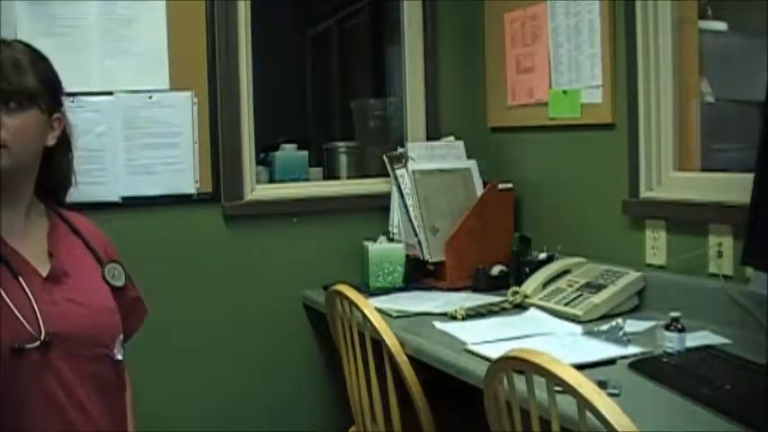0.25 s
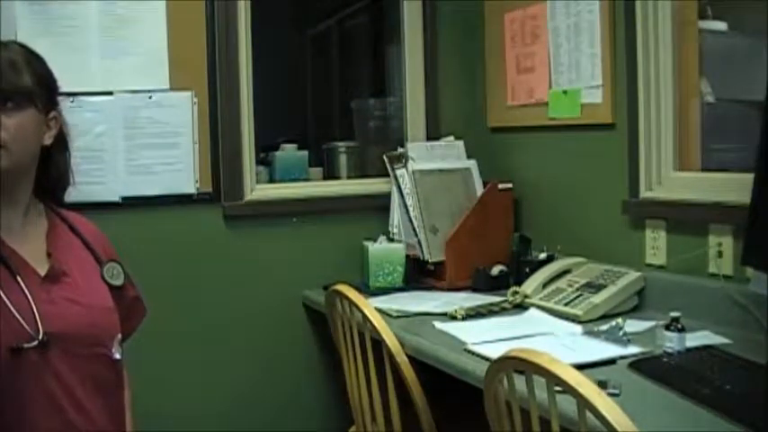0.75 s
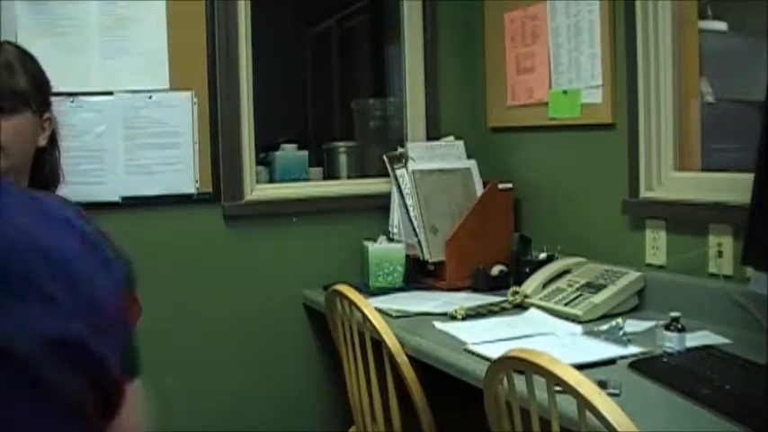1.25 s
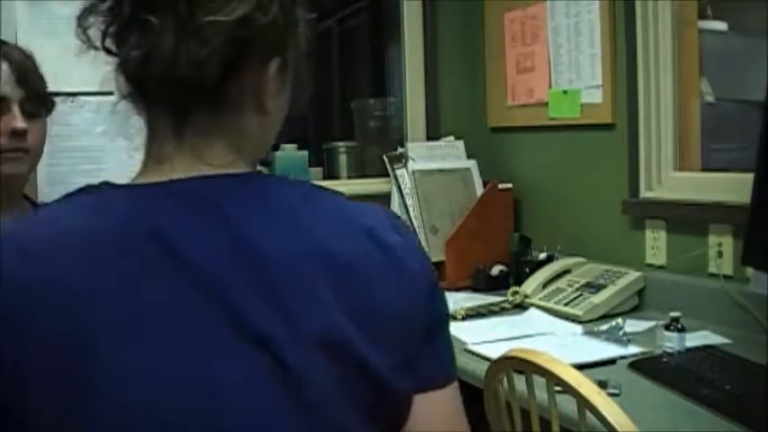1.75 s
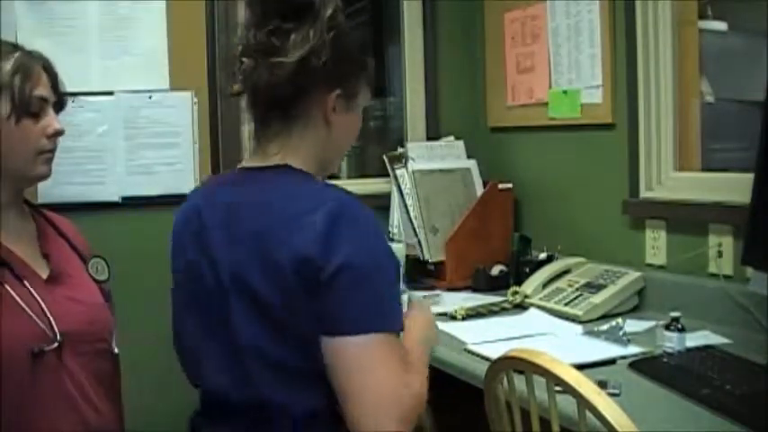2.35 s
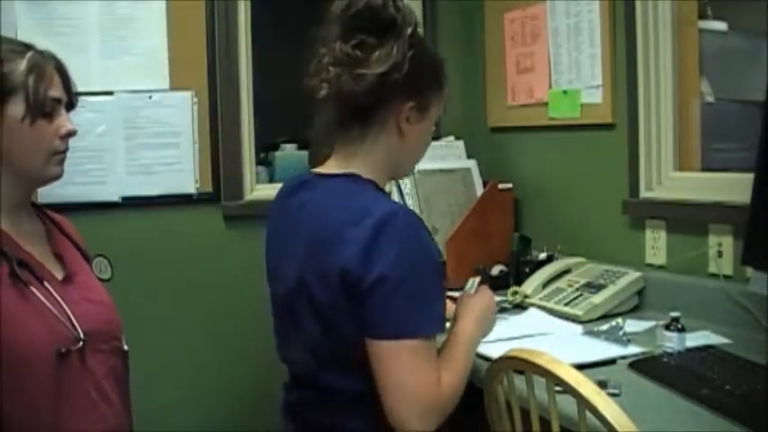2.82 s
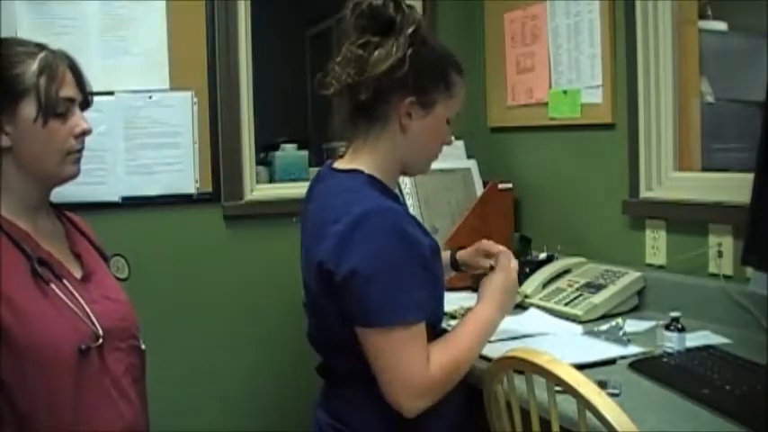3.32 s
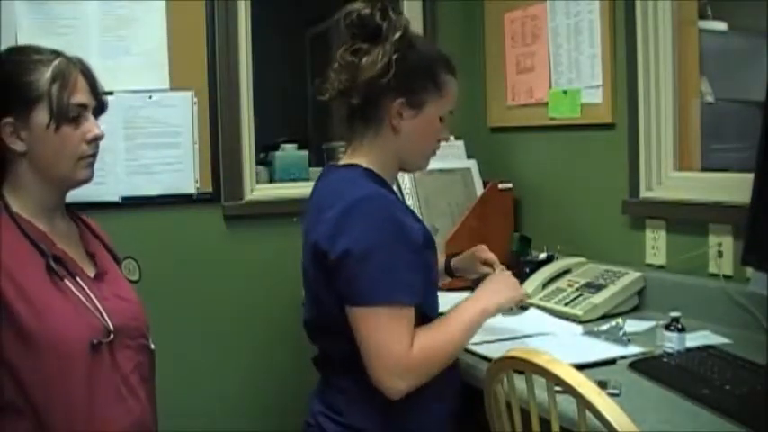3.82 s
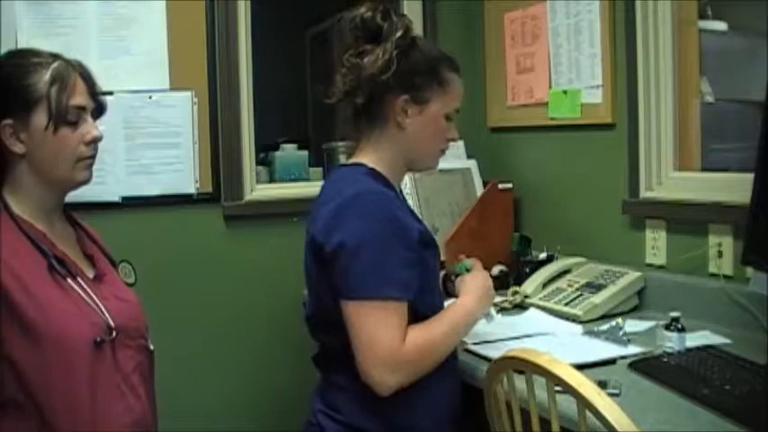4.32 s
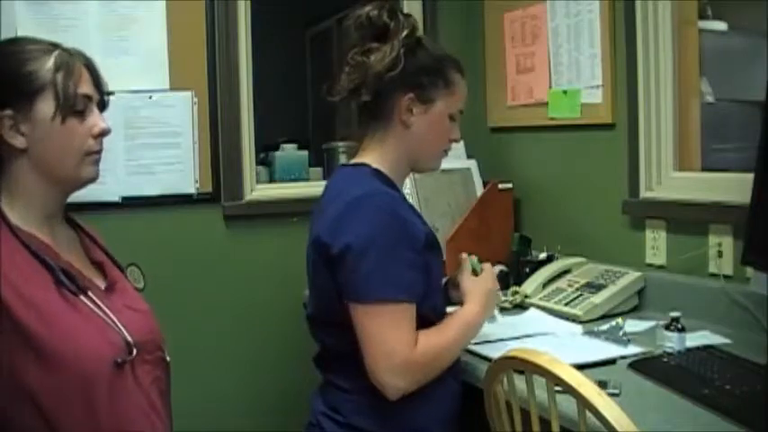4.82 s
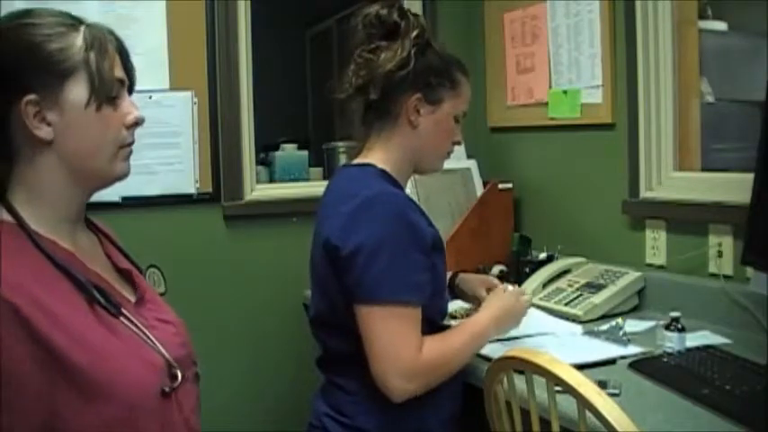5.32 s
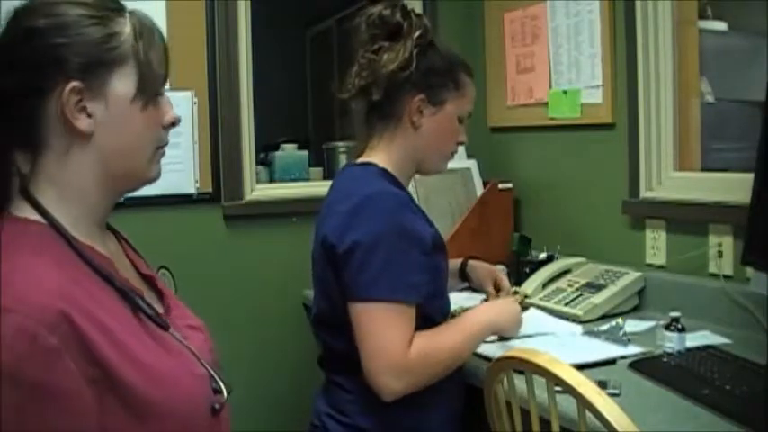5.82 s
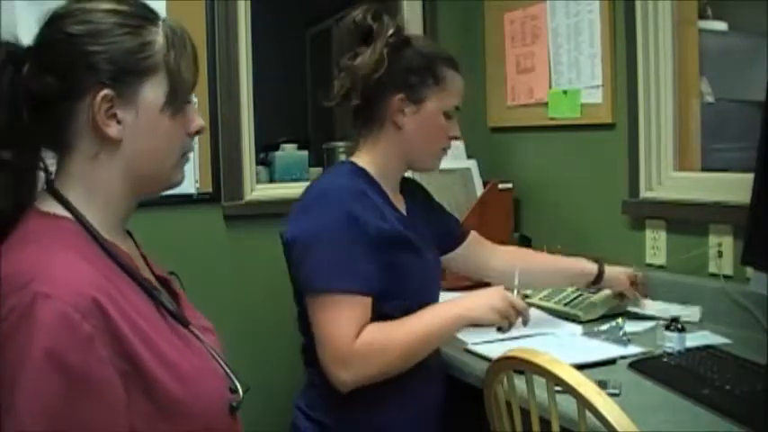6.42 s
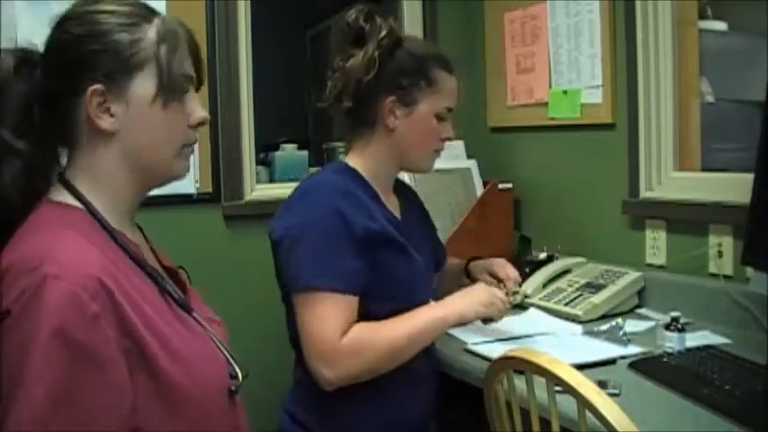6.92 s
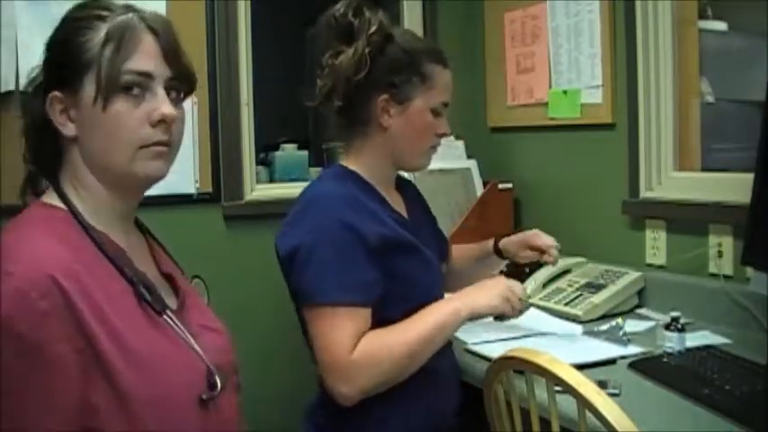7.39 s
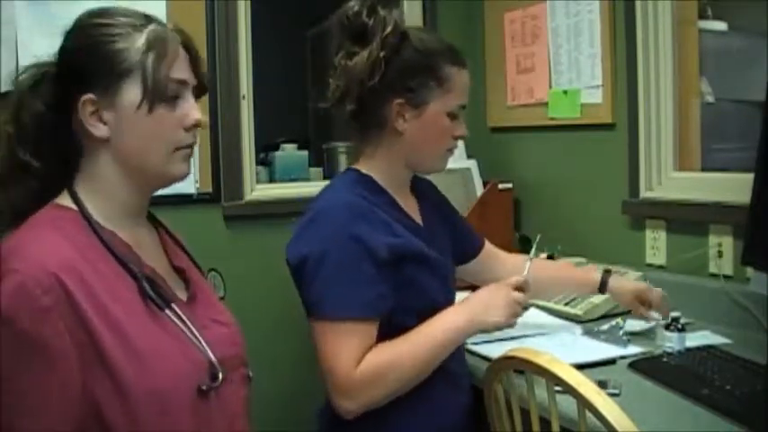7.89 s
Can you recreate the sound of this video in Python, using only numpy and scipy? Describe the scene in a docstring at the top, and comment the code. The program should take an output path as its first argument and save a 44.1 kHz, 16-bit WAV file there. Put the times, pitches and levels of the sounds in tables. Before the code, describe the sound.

A small, hard-walled indoor room with quiet ventilation: soft air noise, a wavering low hum and a faint duct note. From 0 to 0.7 s, sleeves and paper rub faintly well to the left while thin film ticks and pops. Around 1.3 s a stronger clothing swish and a short crinkle move toward the centre, with a snap at 1.55. Soft rustling continues to 3 s. Short crinkles and a cluster of dull furniture bumps come at 3.0-3.3. From 3.5 the film crackles more, with snaps at 4.05 and 4.3, the loudest sharp pop at 4.46, then a dense bright tearing burst near 4.7. A crisp snap falls at 5.04, smaller crinkles follow, and more snaps come at 6.1 and 6.5. A sleeve rubs at 6.65, hard plastic clicks at 7.0, then faint ticks and rustle to about 8 s. Close microphones, short bright reverberation.

```python
"""Sleeves and paper rub, at first well to the left, and film begins to snap: a plastic and paper syringe wrapper
is picked up, peeled open and put down at a counter in a small, hard-walled room, before two close microphones.
Film snaps are ringing pulses, and crinkle, paper and sleeves are grainy noise swelling with each stroke.
Struck modes make the clicks of the syringe's plastic and the dull bumps of the furniture.
Underneath lie a ventilation fan's wavering hum, coloured air noise and a faint duct note."""
import sys
import numpy as np
from scipy import signal
from scipy.fft import rfft, irfft, next_fast_len
from scipy.io import wavfile

SR = 44100
rng = np.random.default_rng(int(sys.argv[2]) if len(sys.argv) > 2 else 0)


def output_pcm(signal):
    """Save a mono or channel-first signal as 16-bit PCM at the path in sys.argv[1].

    Samples are clipped to [-1, 1] before scaling.
    """
    pcm = np.clip(np.atleast_2d(signal).T, -1, 1) * 32767
    wavfile.write(sys.argv[1], SR, np.round(pcm).astype(np.int16))


N = 359415

# Ventilation air. Each row: frequency in Hz, relative level in dB per Hz.
AIR_SPECTRUM = [(15, -23), (25, -25), (70, -8), (190, -7), (373, -4.5), (489, -6.5), (677, -6.5),
                (887, -11.5), (1040, -9), (1160, -13), (2050, -14.5), (2610, -17.5), (6920, -22),
                (7510, -16.5), (16000, -33)]
AIR_DB = -56.5  # rms level
# The fan's hum as it comes and goes. Each row: time in seconds, relative level in dB.
HUM_LEVEL = [(0.0, -75), (1.5, -61), (3.75, -70), (3.81, -76.5), (7.72, -84), (7.81, -67), (8.15, -90)]
HUM_HZ = 66.2
# How long the room rings. Each row: frequency in Hz, time to fall by 60 dB in seconds.
ROOM_DECAY = [(100, 0.23), (500, 0.32), (2000, 0.29), (5000, 0.35), (9000, 0.24), (15000, 0.27)]
# Colour of the room's answer. Each row: frequency in Hz, level in dB.
ROOM_TONE = [(100, -2), (700, 2.5), (2000, -0.5), (5000, -2), (9500, -0.5), (12000, -3.5), (15000, -10)]
# Likeness of diffuse sound at the two microphones. Each row: frequency in Hz, correlation (1 is identical).
CHANNEL_LIKENESS = [(50, 0.088), (140, 0.021), (300, 0.05), (700, 0.37), (2000, 0.76), (4500, 0.69),
                    (8000, 0.5), (14000, 0.14)]
# Place of the wrapper. Each row: time in seconds, direct sound left minus right in dB,
# share of it scattered on the way (0-1).
WRAPPER_POSITION = [(0, 11.5, 0.48), (1.5, 3, 0.66), (3, 1, 0.48), (4.3, 1.5, 0.01), (5.1, 2, 0.07),
                    (6, 1.5, 0.19), (8, 1, 0.56)]

# Dull bumps on the furniture. Each row: start in seconds, relative level in dB, boom of the spot hit in Hz.
FURNITURE_BUMPS = [(0.137, -44, 125), (0.15, -45, 230), (2.598, -41.5, 600), (2.859, -45.5, 520),
                   (2.895, -41, 523), (3.217, -33.5, 910), (3.225, -32.5, 112), (3.243, -28.5, 764),
                   (3.25, -29.5, 1020), (3.264, -33, 380), (3.288, -45, 106), (3.347, -41, 55),
                   (4.057, -35, 600), (4.594, -41.5, 187), (4.715, -39.5, 655), (5.885, -42.5, 545),
                   (5.935, -49, 420), (6.077, -37, 570), (6.41, -42.5, 222), (6.435, -46, 230),
                   (7.571, -46.5, 220)]
# Modes of the furniture. Each row: frequency in Hz, relative level in dB, time to fall by 60 dB in seconds.
FURNITURE_MODES = [(110, -28, 0.032), (178, -7, 0.013), (301, 0, .03), (350, -3, 0.021), (513, -6, 0.041),
                   (740, -2, 0.047), (1020, 7, 0.0079), (1430, 3, 0.032), (1860, 0, 0.041)]
HARDNESS_RATIO = 2.2  # a contact passes frequencies up to this multiple of its boom

# Spectra of swishing sleeves, scuffed paper and crinkling film.
# Each row: frequency in Hz, relative level in dB per Hz.
SLEEVE_SPECTRUM = [(300, -26), (800, -11.5), (1450, -3.5), (1900, 2), (2500, -4.5), (4500, -9),
                   (9000, -13.5), (15000, -39.5)]
PAPER_SPECTRUM = [(60, -22), (150, -21), (300, -9), (600, -1), (1100, -1.5), (1800, -8.5), (4000, -59),
                  (9000, -41)]
FILM_SPECTRUM = [(200, -43), (800, -25.5), (2000, -7.5), (3200, -3.5), (5000, -2), (7000, -5), (9000, 2),
                 (11000, -15), (13000, -16), (16000, -30)]
# Strokes: sleeves swish, hands scuff over paper, fingers squeeze the film.
# Each row: peak in seconds, relative level in dB, rise in seconds, fall in seconds.
SLEEVE_STROKES = [(0.02, -51.5, 0.13, .95), (0.8, -51, 0.15, 0.067), (1.35, -35.5, 0.24, 0.18),
                  (1.54, -45, 0.23, 0.34), (2.19, -45, 0.31, 0.17), (2.77, -47, 0.34, 0.37),
                  (3.33, -54, 0.64, 0.36), (4.14, -52.5, 0.37, 0.62), (4.88, -55, .35, 1.0),
                  (5.87, -49.5, 0.13, .15), (6.06, -49, 0.17, 0.27), (6.655, -41.5, 0.13, 0.19),
                  (7.81, -56, 0.46, .22)]
PAPER_STROKES = [(0.02, -52.5, 0.12, .45), (1.25, -49.5, 0.12, 0.46), (1.47, -52, 0.18, .4),
                 (2.05, -56, 0.17, 0.5), (2.81, -54, 0.38, 1.0), (4.07, -50.5, 0.6, 0.25),
                 (4.66, -56, 0.17, 0.96), (5.26, -61.5, 0.36, 0.73), (5.89, -53, 0.14, 0.13),
                 (6.1, -59, 0.22, 0.13), (6.67, -49.5, 0.15, .18), (7.85, -60.5, 0.62, 0.41)]
FILM_SQUEEZES = [(0.02, -48, 0.29, 0.21), (0.62, -50, 1, 0.39), (1.305, -35.5, 0.033, 0.055),
                 (1.44, -48.5, 0.21, 0.58), (1.755, -45.5, 0.041, 0.056), (2.095, -50, 0.038, 0.047),
                 (2.33, -52, 0.3, 0.24), (2.89, -44, 0.31, 0.13), (3.01, -47.5, 0.022, 0.027),
                 (3.125, -40, 0.017, 0.025), (3.27, -52.5, 0.18, 1), (3.875, -42.5, .03, 0.11),
                 (3.99, -43, .4, 0.47), (4.205, -43, .02, 0.041), (4.68, -43.5, 0.4, .75),
                 (4.718, -26, 0.07, 0.07), (4.93, -45, 0.083, 0.086), (5.17, -47, 0.45, 0.25),
                 (5.4, -47, 0.059, 0.23), (5.6, -56, 0.39, 0.75), (5.84, -47, 0.055, 0.093),
                 (6.07, -45.5, 0.4, 0.21), (6.495, -43, 0.088, 0.033), (6.68, -51, 0.31, .14),
                 (6.845, -47.5, .015, 0.032), (7.54, -61, 0.27, .75)]
# Each stroke speeds up evenly from rest and slows evenly to rest; its sound grows with this power of the speed.
SPEED_POWER = 1.4

# The syringe's stiff plastic parts click together. Each row: start in seconds, relative level in dB.
SYRINGE_CLICKS = [(6.994, -30), (6.9985, -30), (7.001, -43), (7.091, -41.5)]
# Modes of those parts. Each row: frequency in Hz, relative level in dB, time to fall by 60 dB in seconds.
SYRINGE_MODES = [(2350, -9.5, 0.0058), (2950, -4.5, 0.0075), (4750, -13, 0.0056), (7740, -0.5, 0.01),
                 (9400, -2, .003)]

# The film buckles loudly. Each row: start in seconds, relative level in dB, lows against the middle in dB,
# highs against the middle in dB, ring of the facet in Hz.
FILM_SNAPS = [(0.0978, -47, 2, -13, 1390), (0.1487, -43, 5, 3, 1350), (0.2382, -47.5, 7, 0, 1680),
              (0.2988, -41.5, -12, -7, 3740), (0.371, -48, 4.5, 6, 1720), (0.4128, -44, -1, 4.5, 8270),
              (0.49, -48, -6, -2, 4820), (0.531, -47.5, -5, -14, 4200), (0.5558, -33.5, -6, 3.5, 4570),
              (0.6688, -34, -20.5, -8, 4750), (0.9055, -51.5, -4.5, 4.5, 1370),
              (1.5478, -39, -15, -7, 4580), (2.773, -46.5, -25, 1, 4820), (3.2461, -45, -1, 3, 1390),
              (3.3576, -46, -8, -29, 2070), (3.5535, -43, -6, -3.5, 5040), (3.6699, -51, -20, 0, 6200),
              (3.7297, -50, -10, -14, 3800), (3.798, -43.5, -27.5, 8.5, 8150),
              (3.9605, -44.5, 4.5, 3, 4200), (4.0542, -33.5, -7, 0, 4670), (4.1336, -41, -0.5, 7, 4530),
              (4.2931, -30, -16, 0.5, 6600), (4.4581, -18, -20, 0, 5450), (4.6461, -37, -37, -9, 7740),
              (4.6579, -35, -23, 6, 7580), (4.6781, -34, -30, 4, 9200), (4.7008, -30.5, -28, 7, 8900),
              (4.7104, -25, -15.5, 1, 9400), (4.7146, -37, 6, -12, 7920), (4.955, -46, -3, 8, 8270),
              (5.0418, -25.5, -3, 12.5, 7600), (5.1563, -49, 0, 12, 8270), (5.3189, -46, -1, -3, 4470),
              (5.3862, -46, -6, 8.5, 6400), (5.4643, -46.5, -10, 2, 3230), (5.5763, -51, -15, 26, 8200),
              (5.6304, -48, -14, 8, 7850), (5.818, -49.5, 3, 10.5, 9990), (5.8664, -42, 10, 1, 1450),
              (5.9154, -46, -9, 9, 1720), (6.0788, -33, -3.5, 1.5, 5400), (6.2333, -52.5, 6.5, 31, 9300),
              (6.442, -42.5, -10, 6, 5050), (6.4641, -32, -15, -8, 5130), (6.4846, -27, -14.5, -2, 4750),
              (7.302, -47, -4, 9.5, 9600), (7.335, -52.5, -3, 17, 9300), (7.785, -41.5, -9, -5, 2270),
              (7.8715, -42, -2, 3, 1750), (7.9259, -46, -2, 3, 1670)]
# Small facets flip at random: mean rate, level against the squeeze and its spread, range of their rings.
FLIPS_PER_S, FLIP_DB, FLIP_SPREAD_DB = 6.9, -2, -2
FLIP_LOW_HZ, FLIP_HIGH_HZ = 2000, 9000

CUTOFF_HZ = 16200  # top of the recorded band


def from_db(db):
    """Decibels to gain."""
    return 10 ** (np.asarray(db) / 20)


def rms_one(x):
    """Scale to rms 1."""
    return x / np.sqrt(np.mean(x ** 2) + 1e-20)


def unit_energy(x):
    """Scale to energy 1 per channel."""
    return rms_one(x) / np.sqrt(x.shape[-1])


def in_time(rows):
    """The columns of a curve at every sample."""
    s, *columns = np.transpose(rows)
    return [np.interp(np.arange(N) / SR, s, c) for c in columns]


def at_hz(points, hz):
    """Read a table on a log-frequency axis."""
    table_hz, values = np.transpose(points)
    return np.interp(np.log(hz + 1e-9), np.log(table_hz), values)


def butter(x, hz, kind, order=2):
    """Causal Butterworth filter."""
    sos = signal.butter(order, np.clip(hz, 10, .47 * SR), kind, fs=SR, output="sos")
    return signal.sosfilt(sos, x)


def resonance(x, hz, q):
    """One resonance with gain 1 at its top."""
    b, a = signal.iirpeak(min(hz, .4 * SR), max(q, 1), fs=SR)
    return signal.lfilter(b, a, x)


def coloured(x, spectrum):
    """Give a noise its spectrum; rms 1."""
    size = next_fast_len(N)
    gain = from_db(at_hz(spectrum, np.fft.rfftfreq(size, 1 / SR)))
    return rms_one(irfft(rfft(x, size) * gain, size)[..., :N])


def drift(rate):
    """Slow random wander of rms 1, with a new value `rate` times a second."""
    knots = rng.standard_normal(N // 20)
    return rms_one(np.interp(np.arange(N) / SR * rate, np.arange(len(knots)), knots))


def diffuse(size):
    """White stereo noise arriving from all sides, as two close microphones hear it."""
    mid, side = rfft(rng.standard_normal((2, size)))
    alike = np.clip(at_hz(CHANNEL_LIKENESS, np.fft.rfftfreq(size, 1 / SR)), -.99, .99)
    return irfft(np.sqrt(1 + alike) * mid + np.sqrt(1 - alike) * side * [[1], [-1]], size)


def add(track, s, sound):
    """Mix a sound in at a time."""
    at = max(round(s * SR), 0)
    track[at:at + len(sound)] += sound[:N - at]


def ventilation(hum_gain_db=-0.5, waver=.6, right_lag=1.0):
    """Steady air noise and a low hum that wavers in phase and lags on the right (both in radians)."""
    hum_db, = in_time(HUM_LEVEL)
    phase = 2 * np.pi * HUM_HZ * np.arange(N) / SR + waver * drift(rate=7.4)
    hum = np.sqrt(2) * from_db(hum_db + hum_gain_db) * np.sin([phase, phase - right_lag])
    air = coloured(diffuse(next_fast_len(N)), AIR_SPECTRUM)
    return hum + from_db(AIR_DB) * air


def duct(hz=268, q=14, level_db=-71):
    """The air stream sounds a faint note in its duct: noise through one resonance."""
    return from_db(level_db) * rms_one(resonance(rng.standard_normal(N), hz, q))


def room(x, build_s=0.00076, counter_s=0.0046, counter_gain=0.1, wall_s=.0128, wall_gain=0.13,
         ripple_db=2.5, ripple_hz=45, count=23):
    """Reflections off the counter and a wall, then a diffuse field that stores each band's energy and lets it die."""
    size = next_fast_len(N)
    bins = np.fft.rfftfreq(size, 1 / SR) / ripple_hz
    # overlapping room modes leave a fine, fixed ripple on the spectrum
    ripple = from_db(ripple_db * np.interp(bins, np.arange(SR // 10), rng.standard_normal(SR // 10)))
    # neighbouring bands get unrelated noise
    fields = [irfft(rfft(diffuse(size)) * ripple, size)[:, :N] for _ in range(2)]
    edges = np.geomspace(80, 17000, count + 1)
    out = np.zeros((2, N))
    build = np.exp(-1 / (build_s * SR))
    for k, band in enumerate(zip(edges, edges[1:])):
        hz = np.sqrt(band[0] * band[1])
        keep = from_db(-60 / (at_hz(ROOM_DECAY, hz) * SR)) ** 2  # energy left after one sample
        fed = signal.lfilter([1 - build], [1, -build], butter(x, band, "band") ** 2)
        stored = signal.lfilter([1 - keep], [1, -keep], fed)
        noise = rms_one(butter(fields[k % 2], band, "band"))
        out += from_db(at_hz(ROOM_TONE, hz)) * np.sqrt(stored) * noise
    for channel in out:
        add(channel, counter_s, counter_gain * x)
        add(channel, wall_s, wall_gain * x)
    return out


def scattered(x, share, scatter_s=0.0014):
    """Bodies and clutter in the path break part of a sound into a quick flurry that arrives from all sides."""
    size = SR // 100
    flurry = diffuse(size) * np.exp(-np.arange(size) / SR / scatter_s)
    flurry = irfft(np.exp(1j * np.angle(rfft(flurry))), size)  # spread in time, with a flat spectrum
    share = np.clip(share, 0, 1)
    broken = signal.oaconvolve(x[None], flurry, axes=1)[:, :N]
    return np.sqrt(1 - share) * x + np.sqrt(share) * broken


def struck(modes, scatter_db):
    """Decaying modes, each with a random sign and, where scatter is set, a new strength at every blow."""
    t = np.arange(SR // 8) / SR
    hz, level_db, t60 = np.transpose(modes)[:, :, None]
    strength = from_db(level_db + scatter_db * rng.standard_normal(hz.shape))
    strength = strength * rng.choice([-1, 1], hz.shape)
    decay = np.exp(-np.log(1000) * t / t60)
    return np.sum(strength * np.sin(2 * np.pi * hz * t) * decay, axis=0)


def bumps(gain_db=22, lowest_hz=70, scrape=0.83, scrape_s=0.0033, boom=1.0, boom_q=3):
    """Each contact scrapes briefly and rings the panels; the lower the spot booms, the duller it is."""
    out = np.zeros(N)
    for s, db, boom_hz in FURNITURE_BUMPS:
        ring = unit_energy(struck(FURNITURE_MODES, scatter_db=0.0))
        fade = np.exp(-np.arange(len(ring)) / SR / scrape_s)
        grit = butter(rng.standard_normal(len(ring)) * fade, [130, 1900], "band")
        contact = ring + scrape * unit_energy(grit)
        knock = unit_energy(butter(contact, HARDNESS_RATIO * boom_hz, "low", order=4))
        hollow = unit_energy(resonance(signal.unit_impulse(len(ring)), boom_hz, boom_q))
        add(out, s, from_db(db + gain_db) * unit_energy(knock + boom * hollow))
    return butter(out, lowest_hz, "high")


def strokes(rows):
    """Gain of a series of strokes, each swelling from rest to its peak and back; overlapping strokes add in power."""
    t, power = np.arange(0, N, 20) / SR, 0
    for peak_s, db, rise_s, fall_s in rows:
        speed = np.maximum(1 - np.maximum((peak_s - t) / rise_s, (t - peak_s) / fall_s), 0)
        power = power + (from_db(db) * speed ** SPEED_POWER) ** 2
    return np.interp(np.arange(N) / SR, t, np.sqrt(power))


def grains(per_s, spread_db, clump_db, smooth, densest=1.5):
    """Tiny slips of uneven size, coming in clumps over smooth friction; rms 1."""
    rate = per_s * from_db(clump_db * np.minimum(drift(rate=45), densest))
    born = rng.random(N) < rate / SR
    sizes = from_db(spread_db * np.minimum(rng.exponential(1, N), 4)) * rng.choice([-1, 1], N)
    return rms_one(rms_one(born * sizes) + smooth * rng.standard_normal(N))


def facets(x, low_hz=1800, high_hz=13000, q=6, count=16):
    """Each grain sets a facet of its own ringing briefly; rms 1."""
    dealt = rng.integers(0, count, N)  # which facet each sample drives
    facet_hz = np.geomspace(low_hz, high_hz, count)
    return rms_one(sum(resonance(x * (dealt == k), hz, q) for k, hz in enumerate(facet_hz)))


def handling(scuff_gain_db=-2.0, swish_gain_db=-3, crinkle_gain_db=-0.5, plain=0.36):
    """Paper and sleeves slide with a dull, dense grain; the film crinkles brighter and sparser, in changing colours."""
    scuff = coloured(grains(per_s=1100, spread_db=0.5, clump_db=7.5, smooth=0.71), PAPER_SPECTRUM)
    swish = coloured(grains(per_s=1800, spread_db=6.0, clump_db=2.5, smooth=0.71), SLEEVE_SPECTRUM)
    creases = grains(per_s=300, spread_db=2.0, clump_db=9.5, smooth=0.62)
    crinkle = coloured(facets(creases) + plain * creases, FILM_SPECTRUM)
    paper = from_db(scuff_gain_db) * strokes(PAPER_STROKES) * scuff
    sleeves = from_db(swish_gain_db) * strokes(SLEEVE_STROKES) * swish
    film = from_db(crinkle_gain_db) * strokes(FILM_SQUEEZES) * crinkle
    return paper + sleeves + film


def clicks(gain_db=20, crack=0.4, crack_s=0.001):
    """Hard plastic on hard plastic: a broad crack and a short ring."""
    out = np.zeros(N)
    for s, db in SYRINGE_CLICKS:
        ring = unit_energy(struck(SYRINGE_MODES, scatter_db=1.0))
        fade = np.exp(-np.arange(len(ring)) / SR / crack_s)
        tick = butter(rng.standard_normal(len(ring)) * fade, [1000, 10500], "band")
        add(out, s, from_db(db + gain_db) * (ring + crack * unit_energy(tick)))
    return out


def flips(low_db=-6, high_db=2):
    """Small snaps at random moments, following the strength of the squeeze; rows as in FILM_SNAPS."""
    when, pitch, chance = rng.random((200, 3)).T
    at = (when * N).astype(int)
    squeeze_db = 20 * np.log10(strokes(FILM_SQUEEZES)[at] + 1e-9)
    db = squeeze_db + FLIP_DB + FLIP_SPREAD_DB * rng.standard_normal(len(at))
    hz = FLIP_LOW_HZ * (FLIP_HIGH_HZ / FLIP_LOW_HZ) ** pitch
    chosen = np.flatnonzero(chance < FLIPS_PER_S * N / SR / len(at))
    return [(at[k] / SR, db[k], low_db, high_db, hz[k]) for k in chosen]


def snaps(crumble=0.11, crumble_s=0.00055, ring=1.18, ring_q=8, under_ring=0.47, under_ratio=0.434,
          spread=0.47, band_edges_hz=(580, 2000, 6000, 10800),
          direct_db=27.5, treble_beaming=0.19, radiated_db=33.0):
    """A facet flips in one pulse, rings in two modes and sets off tiny creases; returns direct and radiated sound."""
    direct, radiated = np.zeros((2, N))
    t = np.arange(SR // 50) / SR
    for s, db, low_db, high_db, hz in FILM_SNAPS + flips():
        creases = crumble * rng.standard_normal(len(t)) * np.exp(-t / crumble_s)
        pulse = signal.unit_impulse(len(t)) + creases
        main_mode = ring * resonance(pulse, hz, ring_q)
        under_mode = under_ring * resonance(pulse, under_ratio * hz, ring_q)
        pulse = pulse + main_mode + under_mode
        # bending waves in the film carry the highs faster than the lows
        pulse = signal.sosfilt([[-spread, 1, 0, 1, -spread, 0]] * 4, pulse)
        snap = 0
        for k, band_db in enumerate([low_db, 0, high_db]):
            band = unit_energy(butter(pulse, band_edges_hz[k:k + 2], "band"))
            # alternating signs let neighbouring bands join without a notch
            snap = snap + (-1) ** k * from_db(band_db) * band
        snap = unit_energy(snap)
        # the brighter a snap, the more of it is beamed straight ahead
        add(direct, s, from_db(db + direct_db + treble_beaming * high_db) * snap)
        add(radiated, s, from_db(db + radiated_db) * snap)
    return direct, radiated


def scene(room_db=0.0, bump_room_db=2, hand_direct_db=-3.0, bump_direct_db=0.5, left_db=1.3):
    """Wrapper, hands and furniture reach the microphones directly and by way of the room, over the ventilation."""
    direct, radiated = snaps()
    hands = handling() + clicks()
    knocks = bumps()
    pan_db, share = in_time(WRAPPER_POSITION)
    sides = np.array([[.5], [-.5]])  # left and right each take half the level difference
    close = direct + from_db(hand_direct_db) * hands + from_db(bump_direct_db) * knocks
    near = scattered(close, share) * from_db(sides * pan_db)
    far = room(radiated + hands + from_db(bump_room_db) * knocks)
    far = from_db(room_db + sides * left_db) * far
    return near + far + ventilation() + duct()


def gain_control(x, threshold_db=-4.0, release_db_per_s=95, attack_s=0.0022):
    """A loud peak slips through, then the gain drops and recovers, which flattens the tail behind it."""
    over_db = np.maximum(20 * np.log10(np.abs(x).max(axis=0) + 1e-9) - threshold_db, 0)
    ramp = release_db_per_s * np.arange(N) / SR
    held_db = np.maximum.accumulate(over_db + ramp) - ramp
    r = np.exp(-1 / (attack_s * SR))
    return x * from_db(-signal.lfilter([1 - r], [1, -r], held_db))


def record(dry, microphone_hz=15000, lopsided=0.13):
    """The microphones soften the top, gain control acts, high peaks bend to one side and clip, the top is cut."""
    heard = gain_control(butter(dry, microphone_hz, "low", order=1))
    heard = np.clip(heard + lopsided * heard ** 2, -1, 1)
    return signal.sosfilt(signal.ellip(10, .1, 80, CUTOFF_HZ, fs=SR, output="sos"), heard)


dry = scene()
out = record(dry)
output_pcm(out)
```